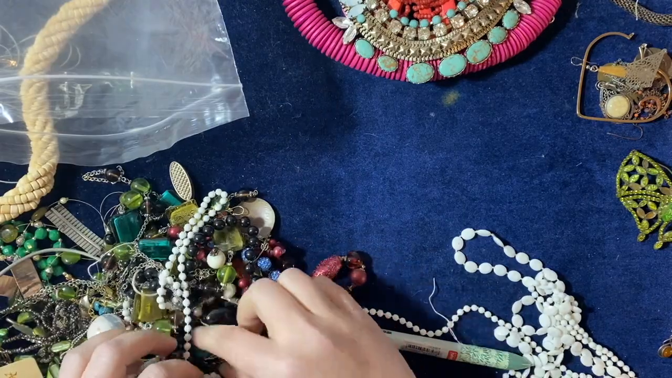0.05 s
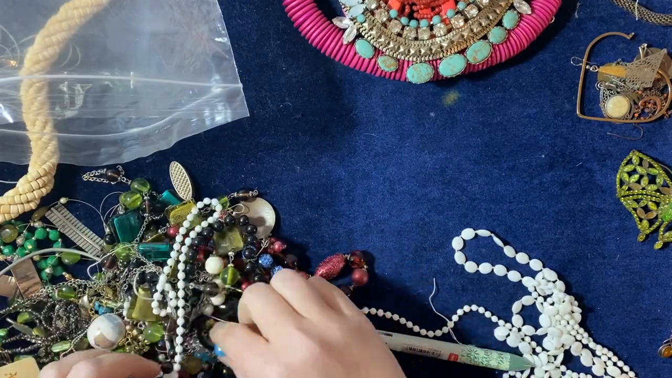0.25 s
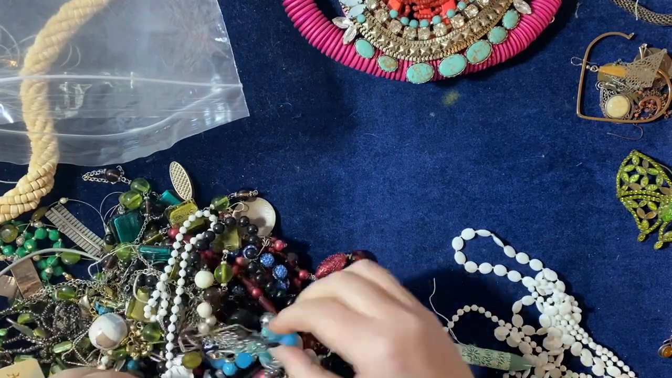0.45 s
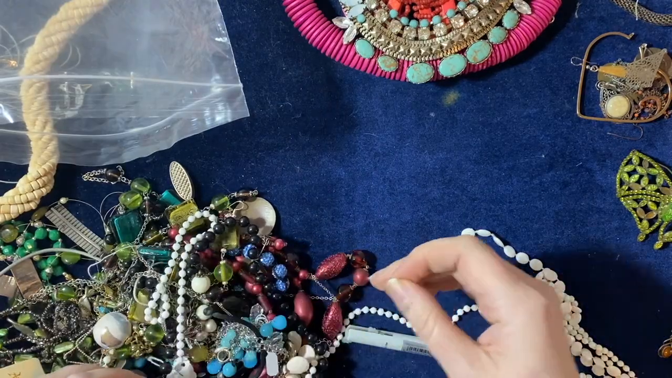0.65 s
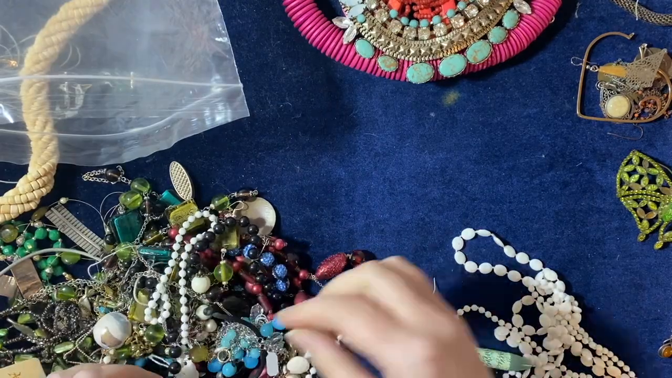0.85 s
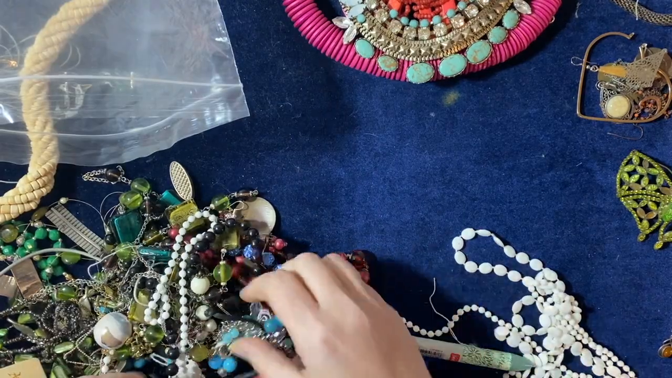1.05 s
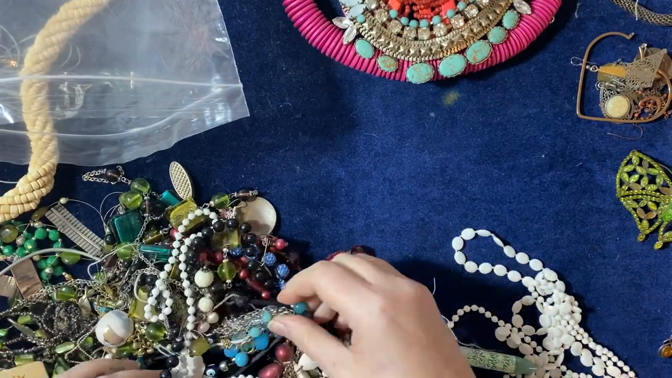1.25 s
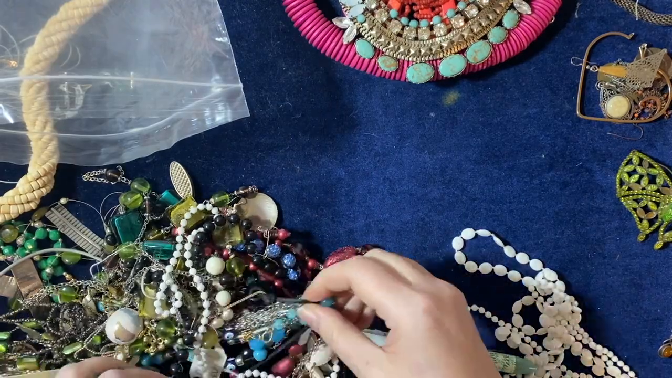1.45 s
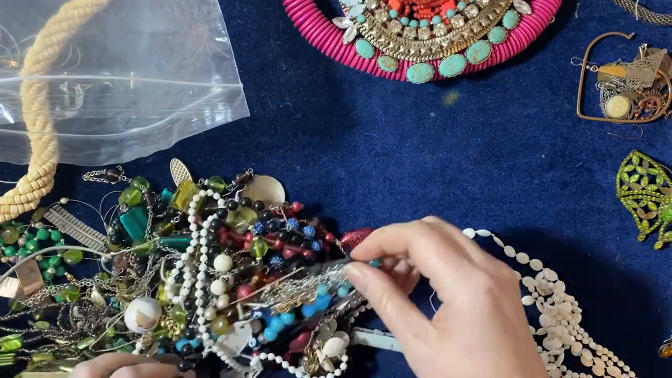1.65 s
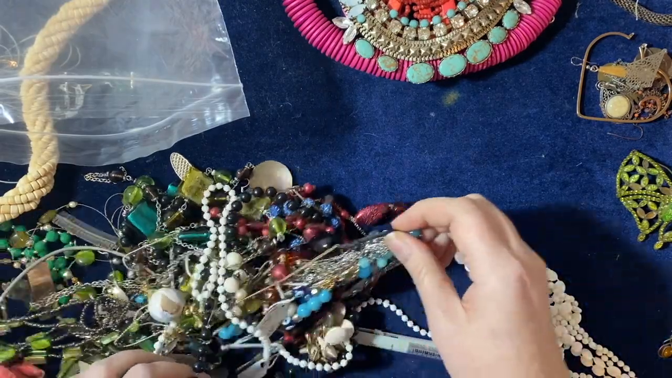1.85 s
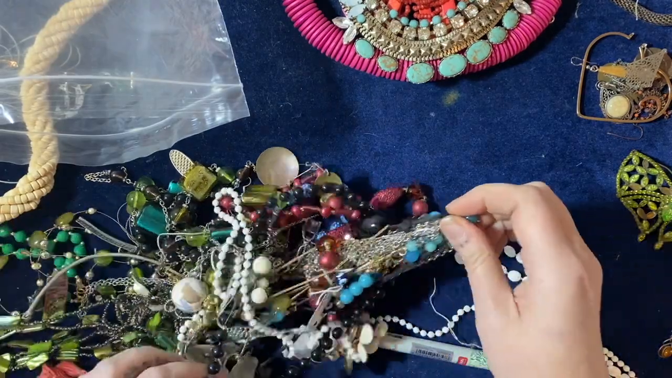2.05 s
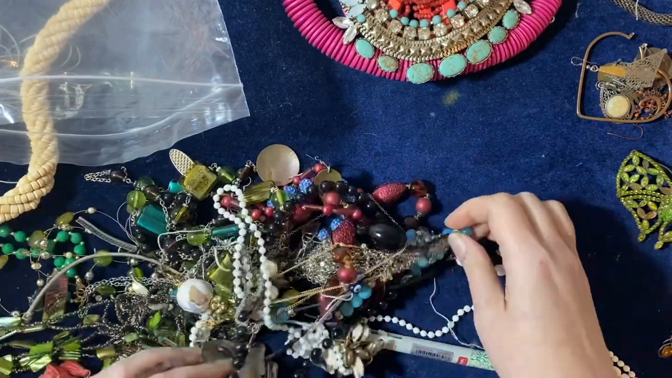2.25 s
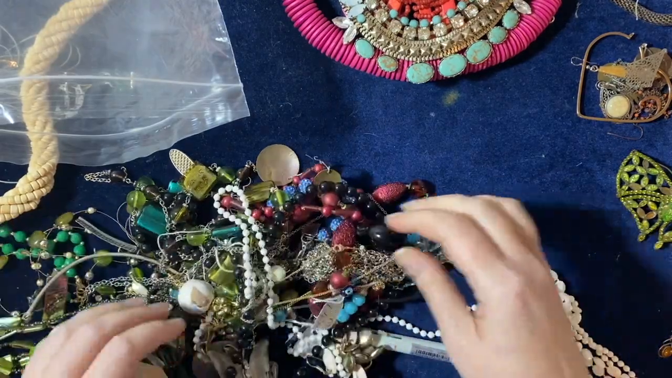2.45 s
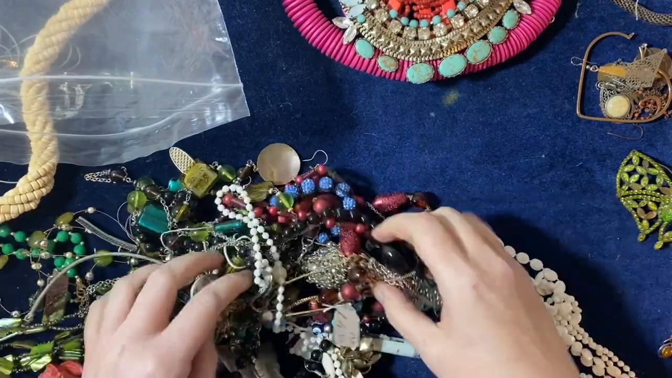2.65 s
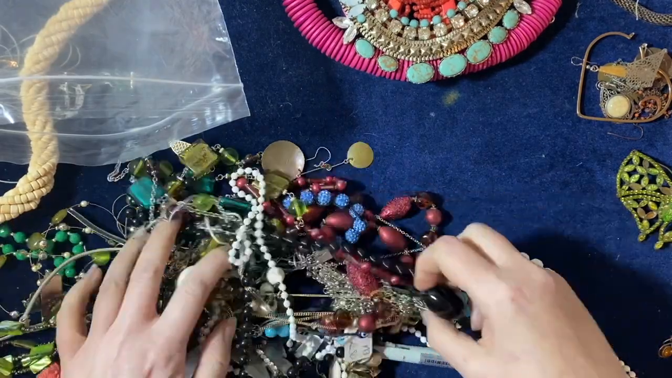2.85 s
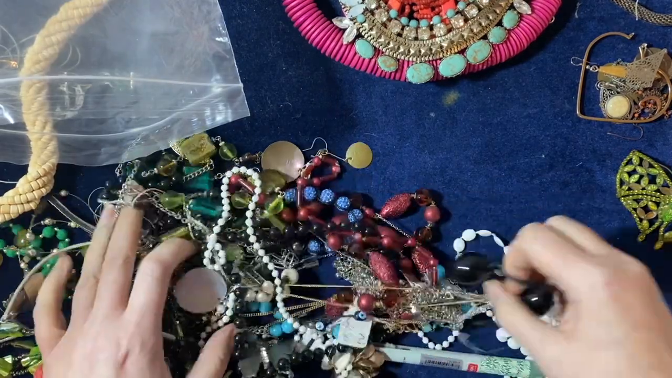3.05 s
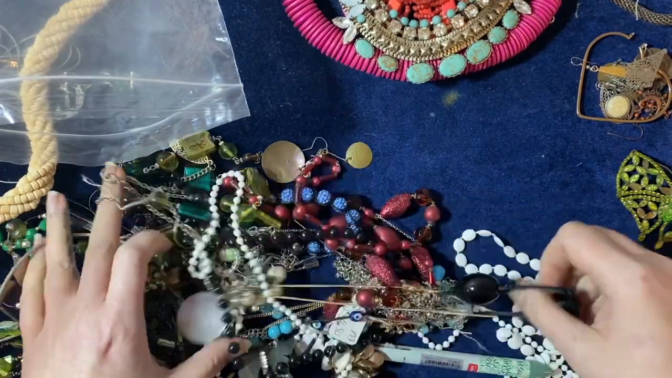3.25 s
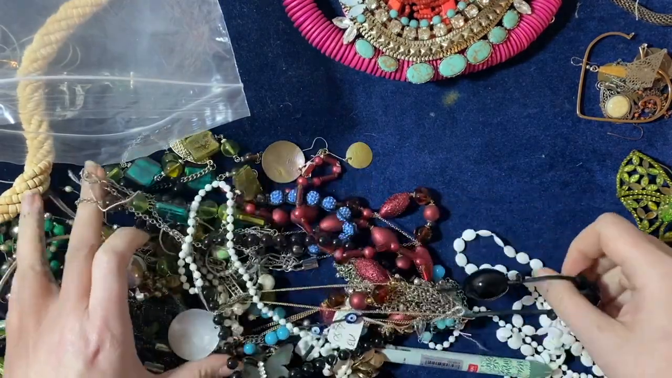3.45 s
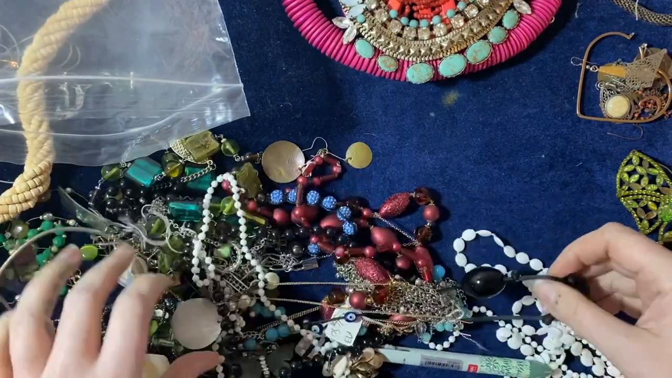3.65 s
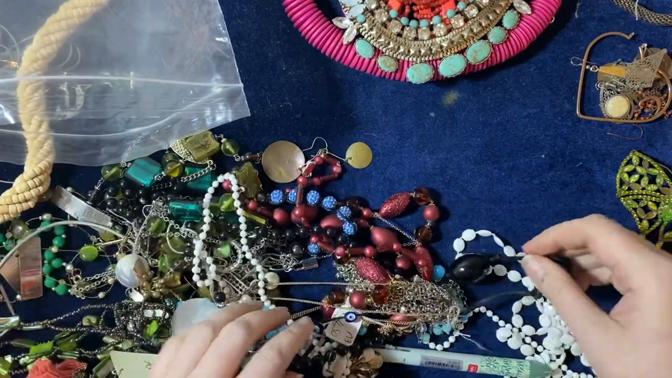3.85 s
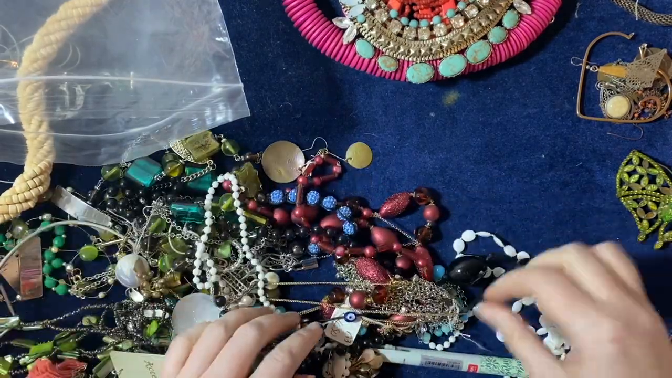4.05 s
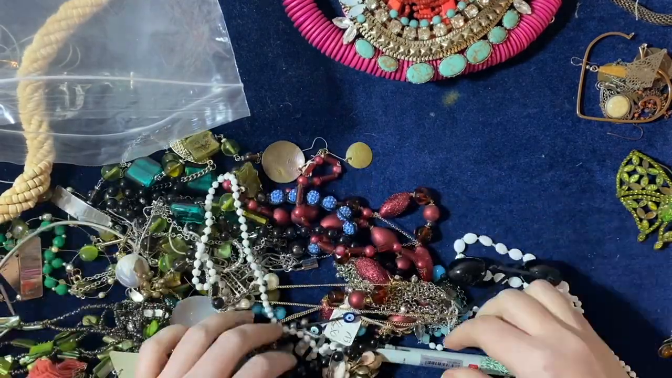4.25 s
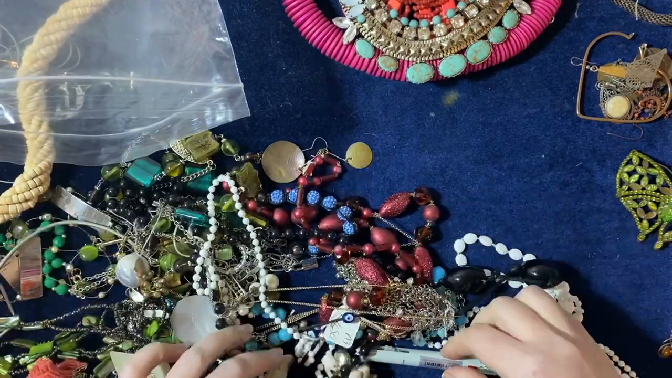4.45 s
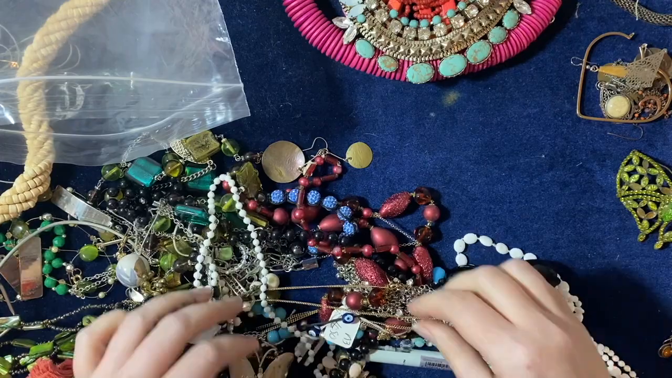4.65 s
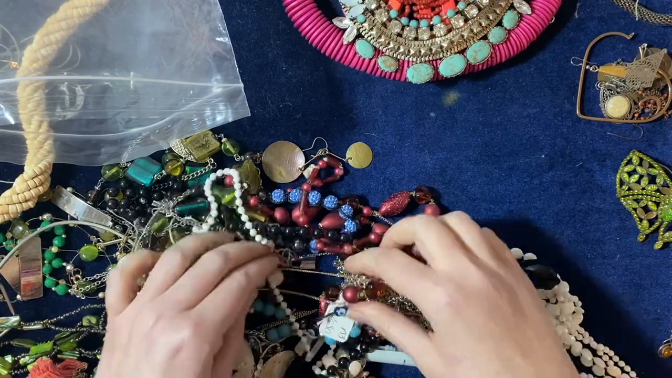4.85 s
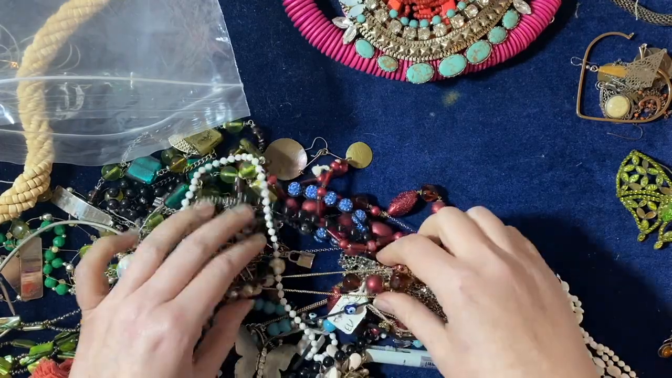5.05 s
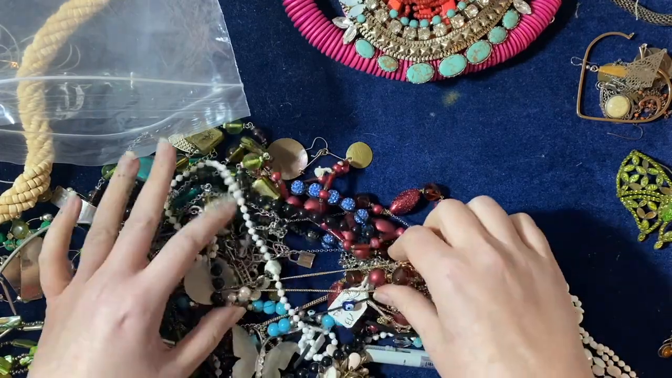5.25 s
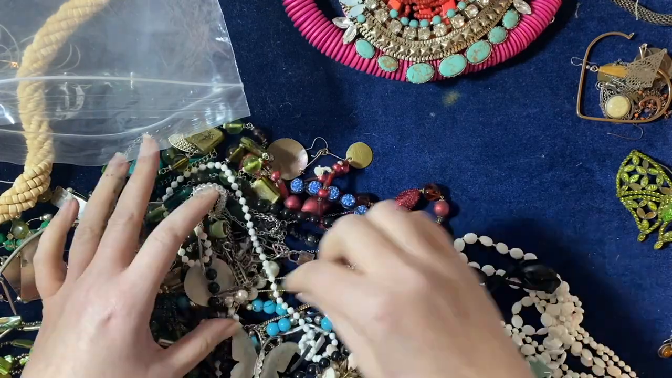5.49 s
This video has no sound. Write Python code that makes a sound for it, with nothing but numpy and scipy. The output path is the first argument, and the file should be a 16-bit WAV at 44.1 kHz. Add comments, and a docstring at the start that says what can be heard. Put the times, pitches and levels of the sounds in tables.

```python
"""Rummaging through bead strings and metal chains

Two hands stir a heap of jewellery on a cloth-covered table in a small room, close to a stereo microphone.
Sliding links sizzle and beads rattle: random contacts strike bands of noise, and loose pieces ring briefly.
Beads snap as paired noise bursts; pendants ring as close pairs of damped sines.
Heavy beads knock as modes within noise clusters; soft landings thud through the modes of the table.
A faint diffuse tail and quiet air noise lie around the heap."""
import sys
import numpy as np
from scipy import signal
from scipy.fft import rfft, irfft, next_fast_len
from scipy.io import wavfile
from scipy.ndimage import uniform_filter1d

SR = 44100
rng = np.random.default_rng(int(sys.argv[2]) if len(sys.argv) > 2 else 0)


def generate_wav(signal):
    """Clip the signal to [-1, 1] and save it as 16-bit WAV at the path in sys.argv[1]."""
    frames = np.transpose(np.atleast_2d(signal))
    scaled = np.clip(frames, -1, 1) * 32767
    pcm = np.round(scaled).astype(np.int16)
    wavfile.write(sys.argv[1], SR, pcm)


N = 243431  # length in samples

# background air, relative spectrum: f/Hz, level/dB
AIR_SPECTRUM = [(25, -6), (70, 20.5), (130, 7.5), (250, -16.5), (600, -5.5), (2000, -46.5), (7000, -46.5),
                (16000, -20)]
# hand strokes through the heap: start t/s, length t/s, chain links level/dB, small beads level/dB,
# swell over the stroke/dB, weight on the table/dB above the small beads
HAND_STROKES = [(0.007, 0.077, -51.5, -61.5, -2.5, 5), (0.108, 0.017, -44, -51.5, -8, 3),
                (0.192, 0.16, -49.5, -57, -16, -6), (0.38, 0.11, -42.5, -54, 7.5, -8),
                (0.561, 0.033, -40, -53, -8.5, 2), (0.663, 0.031, -58.5, -66, 3.5, -7),
                (0.869, 0.043, -74, -80.5, -3, 2), (0.974, 0.074, -65.5, -71, 0, -11.5),
                (1.05, 0.027, -47, -56.5, 2.5, 0.5), (1.118, 0.16, -54, -64.5, -5, -1.5),
                (1.285, 0.35, -51.5, -56.5, 8.5, -1), (1.682, 0.32, -45, -47.5, 2.5, -1),
                (1.997, 0.12, -45, -54, -4.5, 0), (2.16, 0.14, -43.5, -53.5, 3, 3.5),
                (2.389, 0.012, -65, -68.5, 4, 2.5), (2.547, 0.19, -40, -48, 4.5, 4.5),
                (2.758, 0.23, -38, -50, 2, 2.5), (3.022, 0.16, -43, -53.5, -4, 1),
                (3.231, 0.08, -43, -49.5, -5, 0.5), (3.36, 0.098, -53.5, -64.5, -5.5, 4.5),
                (3.528, 0.16, -45, -57, 9, 0.5), (3.861, 0.023, -72, -78, -4, 16.5),
                (3.959, 0.041, -72.5, -73, -1.5, 25), (4.14, 0.006, -56.5, -70, -6, 7.5),
                (4.265, 0.055, -57.5, -65, 6, 1.5), (4.372, 0.12, -53.5, -58, -18, -6.5),
                (4.533, 0.041, -53.5, -57.5, -0.5, -8.5), (4.8, 0.23, -45, -54.5, -0.5, 0.5),
                (5.049, 0.022, -46.5, -57.5, 14, -0.5), (5.117, 0.084, -45.5, -56.5, 0.5, 5.5),
                (5.273, 0.016, -44, -55.5, -0.5, -2), (5.332, 0.021, -59, -63, 4.5, 0),
                (5.503, 0.026, -66, -73, -7, -1)]
# relative spectra of the contacts, from the table to the finest chain: f/Hz, level/dB
RUMBLE_SPECTRUM = [(35, -16), (65, -8.5), (115, 1.5), (180, -4), (300, -11), (450, -11)]
HEAVY_SPECTRUM = [(350, 5), (500, -7), (700, 0), (1000, -2), (1300, -10.5), (1700, -5.5), (2100, -50.5)]
SMALL_SPECTRUM = [(1900, -3), (2800, -1.5), (4500, 4), (6700, -1)]
LINKS_SPECTRUM = [(6300, -4), (8000, -2.5), (10000, -10.2), (11500, 10.5), (13500, -8.2), (16000, 7)]
# beads and links snapping together: t/s, level/dB, f/Hz, hollow body level/dB relative to the snap's
# (both before the gains in clicks)
BEAD_CLICKS = [(0.0942, -19.5, 10400, -31), (0.4182, -17.5, 11700, -41.5), (0.3995, -27, 11700, -25.5),
               (0.478, -22, 11800, -34), (0.5326, -10.5, 15200, -28), (0.5405, -21, 7200, -28),
               (0.5814, -20, 10200, -42), (0.6824, -33, 11400, -41), (0.94, -23, 10400, -30.5),
               (1.063, -35, 7800, -36.5), (1.1867, -30, 6940, -39), (1.4122, -17.5, 15400, -32.5),
               (1.5961, -20.5, 12600, -41), (1.6866, -25.5, 15200, -15.5), (1.7493, -29, 4400, -13),
               (1.876, -28, 5300, -18), (1.936, -17.5, 11900, -24), (2.0773, -19.5, 12300, -34.5),
               (2.1553, -23, 9900, -37.5), (2.3043, -20.5, 8800, -30), (2.4088, -27.5, 13900, -28.5),
               (2.5075, -38, 10600, -19), (2.5402, -22, 8240, -23.5), (2.7616, -16, 15100, -27.5),
               (2.815, -17, 7060, -20), (2.826, -10, 10100, -41), (2.875, -18, 11300, -45),
               (2.9465, -12, 11700, -33), (2.9946, -14.5, 10300, -23), (3.056, -19.5, 12400, -35),
               (3.1976, -26, 10300, -43), (3.2276, -6.5, 15000, -53), (3.3167, -25, 10700, -36.5),
               (3.5475, -19, 11100, -56), (3.644, -15.5, 14800, -36), (3.873, -37.5, 11700, -38),
               (3.983, -49, 11800, -39), (4.106, -51, 11500, -41.5), (4.3378, -32, 11300, -34),
               (4.3585, -16, 14200, -29), (4.516, -25, 8040, -25), (4.6359, -42, 11400, -39),
               (4.787, -49, 3000, -22), (4.8237, -32.5, 2990, -10), (4.8778, -16.5, 11400, -40),
               (4.9728, -19.5, 9600, -31), (5.007, -21.5, 11100, -28), (5.1143, -10.5, 13400, -27),
               (5.2021, -20.5, 11300, -46), (5.2773, -21, 10850, -53), (5.3912, -27.5, 15000, -54.5)]
# soft landings of fingers and bundles on the padded table: t/s, level/dB before the gain in thuds
TABLE_THUDS = [(0.095, -46), (0.549, -51), (1.595, -54), (2.541, -30.5), (2.581, -28), (2.627, -28.5),
               (2.643, -39), (2.707, -26.5), (2.812, -24.5), (2.936, -30.5), (3.038, -38.5), (3.225, -42),
               (3.615, -25.5), (3.879, -30), (3.946, -29), (3.966, -32.5), (4.802, -39.5), (4.98, -36),
               (5.111, -34.5)]
# modes of the table top: f/Hz, relative level/dB, t60/s
TABLE_MODES = [(70, -14, 0.55), (113.8, -5, 0.25), (158.2, -1, 0.087), (230, 1.5, 0.085), (272, 3.5, 0.049),
               (337, -1, 0.058), (457, -5, 0.067), (566, -6, 0.034)]
# large beads knocking on the table: t/s, level/dB before the gains in knocks, f/Hz
BEAD_KNOCKS = [(0.096, -38.5, 825), (0.184, -40.5, 920), (0.553, -46.5, 840), (1.598, -43.5, 1020),
               (2.577, -25, 990), (2.625, -25.5, 975), (2.648, -27.5, 624), (2.698, -25, 1660),
               (2.715, -30, 624), (2.937, -31, 940), (2.994, -38.5, 890), (3.228, -30.5, 1020),
               (3.612, -30.5, 600), (3.650, -40.5, 1620), (3.881, -53, 800), (3.948, -34, 760),
               (3.95, -42.5, 1560), (4.519, -43.5, 1540), (4.824, -49.5, 1460), (5.116, -38.5, 740)]
# modes of one knock: ratio to its pitch, relative level/dB
MODES_OF_KNOCK = [(.47, -4), (1, -2), (1.679, -14)]
# partials of ringing pendants and rings: t/s, level/dB, f/Hz, t60/s
PENDANT_PARTIALS = [(0.186, -40.5, 3470, 0.015), (0.402, -40, 3680, 0.018), (0.696, -59, 3750, 0.09),
                    (0.938, -53, 2494, 0.14), (0.942, -45.5, 2900, 0.035), (0.942, -51, 4040, 0.044),
                    (0.940, -49, 4800, 0.039), (2.078, -50, 8000, 0.031), (4.557, -38, 4586, 0.044),
                    (4.556, -56, 4520, 0.33), (4.557, -35, 8180, 0.053), (4.557, -34, 10700, 0.027),
                    (4.637, -39, 11470, 0.023), (4.760, -52.5, 3620, 0.042), (4.785, -56, 2830, 0.043),
                    (4.801, -54, 2650, 0.061), (4.824, -29.5, 2920, 0.011), (4.822, -41, 3700, 0.012)]
# correlation of left and right: f/Hz, coefficient
STEREO_LIKENESS = [(100, .99), (300, .96), (600, .62), (2000, .56), (5200, .62), (7000, .87), (16000, .87)]
# microphone pair: f/Hz, phase by which left leads/rad, left over right level/dB
MICROPHONE_PORTS = [(0, 0, .3), (300, 0, .2), (700, -.4, 2.0), (1100, .9, 3.5), (1700, .6, 1.5),
                    (3000, .8, 4.0), (5000, 0, 2.5), (7200, 0, .4), (9100, -3.1, .2), (11200, -6.3, .2),
                    (13300, -9.4, .2), (15300, -12.4, 0), (17000, -12.9, 0)]

ATTACK_DB_PER_S, SETTLE_DB_PER_S = 551.5, 237  # a stroke starts quickly and settles more slowly
# the table is at TABLE_DB when the load on it is, and takes a share of the load's swing
TABLE_DB, TABLE_FOLLOWS = -53, .75
# heavy beads: dB relative to the small ones, and the share of a stroke's weight that they feel
HEAVY_DB, HEAVY_FEELS = -5.5, .6
# lesser clicks: number, level above the chains and its spread either way (dB)
TICK_COUNT, TICK_DB, TICK_SPREAD_DB = 110, 14.5, 3
# their hollow body (dB relative to the snap, as in BEAD_CLICKS), its spread either way (dB), pitch range
TICK_BODY_DB, TICK_BODY_SPREAD_DB, TICK_LOW_HZ, TICK_HIGH_HZ = -33.5, 9, 5900, 15000
ROOM_T60_S, ROOM_DB = 0.26, -16
CUTOFF_HZ = 15900


def from_db(db):
    """Logarithmic levels: decibels become an amplitude ratio."""
    return 10 ** (np.asarray(db) / 20)


def rms_one(x):
    """Normalisation: the mean power becomes 1."""
    return x / np.sqrt(np.mean(x ** 2) + 1e-20)


def at_hz(points, hz):
    """Interpolation on a logarithmic frequency axis."""
    f, value = np.transpose(points)
    return np.interp(np.log(hz), np.log(f), value)


def add(out, s, sound):
    """Superposition: a sound is summed in from time s."""
    start = int(np.clip(round(s * SR), 0, N - 1))
    out[..., start:start + sound.shape[-1]] += sound[..., :N - start]


def band(x, low, high, order=2):
    """Band limiting by a causal Butterworth filter."""
    sections = signal.butter(order, [low, min(high, .47 * SR)], "band", fs=SR, output="sos")
    return signal.sosfilt(sections, x + 1e-18)


def fading(t, t60):
    """Exponential decay: the level falls 60 dB in t60."""
    return np.exp(-np.log(1000) * t / t60)


def drift(rate):
    """Slow random fluctuation: straight lines join rate random values a second, at rms 1."""
    knots = rng.standard_normal(int(rate * N / SR) + 2)
    return rms_one(np.interp(np.arange(N) * rate / SR, np.arange(len(knots)), knots))


def pair(two, hz):
    """Partial correlation: the sum and difference of two unrelated draws form left and right."""
    alike = np.clip(at_hz(STEREO_LIKENESS, hz), 0, 1)
    shared = np.sqrt(1 + alike) * two[0]
    opposed = np.sqrt(1 - alike) * two[1] * np.array([[1], [-1]])
    return shared + opposed


def coloured(force, spectrum, count):
    """Forced resonance: random force drives count bands, neighbours from unrelated draws."""
    edges = np.geomspace(spectrum[0][0], spectrum[-1][0], count + 1)
    out = 0
    struck = force * rng.standard_normal((2, 2, N))
    for k, (low, high) in enumerate(zip(edges, edges[1:])):
        hz = np.sqrt(low * high)
        out = out + from_db(at_hz(spectrum, hz)) * band(pair(struck[k % 2], hz), low, high)
    return rms_one(out)


def air():
    """Stationary noise: the quiet air has a fixed spectrum and steady mean power."""
    return from_db(-66.0) * coloured(1, AIR_SPECTRUM, count=12)


def stirring():
    """Addition of powers: overlapping strokes sum to levels of chains, small beads and load, in dB."""
    t = np.arange(0, N, 44) / SR  # about 1 ms steps
    start, length, links_db, beads_db, swell_db, weight_db = np.transpose(HAND_STROKES)[:, :, None]
    age = t - start
    attack_db = ATTACK_DB_PER_S * np.minimum(age, 0)
    hold_db = swell_db * (np.clip(age / length, 0, 1) - .5)
    settle_db = SETTLE_DB_PER_S * np.maximum(age - length, 0)
    shape_db = attack_db + hold_db - settle_db

    def total(db):
        """Incoherent sources: their powers add."""
        power = np.sum(from_db(db + shape_db) ** 2, axis=0)
        return np.interp(np.arange(N) / SR, t, 10 * np.log10(power + 1e-20))

    return total(links_db), total(beads_db), total(beads_db + weight_db)


def rattle(level_db, spectrum, per_s, size_db, clump_db, settle_s, slide, count):
    """Clustered random impacts: harder stirring makes them denser, over a sliding hiss."""
    busy = from_db((level_db - level_db.max()) / 2)
    born = rng.random(N) < per_s * busy * from_db(clump_db * drift(45)) / SR
    energy = born * from_db(size_db * np.minimum(rng.exponential(1, N), 3.5)) ** 2
    # each contact jostles its neighbours: its energy decays with time constant settle_s
    energy = signal.lfilter([1], [1, -np.exp(-1 / (settle_s * SR))], energy + 1e-18)
    # the hand sets the overall effort, the contacts only share it out (over about 50 ms)
    energy = energy / (uniform_filter1d(energy, size=2200) + 0.011 * energy.mean())
    return from_db(level_db) * coloured(np.sqrt(energy + slide ** 2), spectrum, count=count)


def beads(level_db, low_hz, high_hz, per_s, size_db, cycles, gain_db, count):
    """Damped free vibration: loose pieces tapped at random lose 60 dB in the given number of cycles."""
    out, t = np.zeros((2, N)), np.arange(SR // 30) / SR
    pitches, ports = np.geomspace(low_hz, high_hz, count), np.array([[1], [-1]])
    for when, which, size, side, apart, chance in rng.random((2000, 6)):
        if chance < per_s * N / SR / 2000:  # keep per_s taps a second on average
            hz = pitches[int(which * count)]
            tap_db = size_db * min(-np.log(1 - size), 3)
            strength = from_db(level_db[int(when * N)] + gain_db + tap_db)
            # each tap has a phase and level difference between the ports
            tone = np.sin(2 * np.pi * hz * t + ports * (apart - .5)) * from_db(ports * 0.5 * side)
            add(out, when * N / SR, strength * tone * fading(t, cycles / hz))
    return out


def heap(links_db, small_db, load_db):
    """Contact noise in four size classes, from table to finest chain, with loose clacks, taps and tinkles."""
    rumble_db = TABLE_DB + TABLE_FOLLOWS * (load_db - TABLE_DB)
    heavy_db = small_db + HEAVY_DB + HEAVY_FEELS * (load_db - small_db)
    rumble = rattle(rumble_db, RUMBLE_SPECTRUM, per_s=130, size_db=2.5, clump_db=1.0,
                    settle_s=0.011, slide=0.57, count=7)
    heavy = from_db(-1) * rattle(heavy_db, HEAVY_SPECTRUM, per_s=300, size_db=-2.5, clump_db=4.5,
                                 settle_s=0.007, slide=0.64, count=11)
    small = from_db(-1.2) * rattle(small_db, SMALL_SPECTRUM, per_s=600, size_db=4, clump_db=4.5,
                                   settle_s=.0017, slide=.45, count=6)
    links = from_db(-2.45) * rattle(links_db, LINKS_SPECTRUM, per_s=990, size_db=4.5, clump_db=6.0,
                                    settle_s=0.0012, slide=0.3, count=6)
    clacks = beads(heavy_db, low_hz=400, high_hz=1800, per_s=70, size_db=2.5,
                   cycles=24, gain_db=2.5, count=18)
    taps = beads(small_db, low_hz=2200, high_hz=6500, per_s=170, size_db=2.7,
                 cycles=32, gain_db=2, count=40)
    tinkle = beads(links_db, low_hz=7090, high_hz=14400, per_s=110, size_db=4,
                   cycles=300, gain_db=-7, count=24)
    return rumble + heavy + small + links + clacks + taps + tinkle


def ticks(links_db):
    """Random point events: rows of lesser clicks, evenly likely in time, as strong as the chains move."""
    when, pitch, size, hollow = rng.random((TICK_COUNT, 4)).T
    db = links_db[(when * N).astype(int)] + TICK_DB + TICK_SPREAD_DB * (2 * size - 1)
    hz = TICK_LOW_HZ * (TICK_HIGH_HZ / TICK_LOW_HZ) ** pitch
    hollow_db = TICK_BODY_DB + TICK_BODY_SPREAD_DB * (2 * hollow - 1)
    return np.transpose([when * N / SR, db, hz, hollow_db])


def over_1_ms(x):
    """Energy normalisation: a burst gets the energy of rms 1 lasting 1 ms."""
    return x / np.sqrt(np.sum(x ** 2) / 2 / (SR / 1000))


def contact(t, rise_s=.0004, snap_t60=.0042, jostle_t60=0.072, jostle_db=-26):
    """Two-stage decay: a snap dies quickly and leaves the weaker jostling of the string."""
    decay = fading(t, snap_t60) + from_db(jostle_db) * fading(t, jostle_t60)
    return (1 - np.exp(-t / rise_s)) * decay


def clicks(rows, bounce_db=-14, snap_db=-6.5, body_db=8, width=1.467, body_low_hz=600, body_high_hz=6500):
    """Impact and rebound: a snap around the bead's pitch repeats weakly after 2.4-2.7 ms, with a duller body."""
    out, t = np.zeros((2, N)), np.arange(1800) / SR
    rebounds = rng.uniform(0.0024, 0.0027, len(rows))
    noises = rng.standard_normal((len(rows), 2, 2, len(t)))
    for (s, db, hz, hollow_db), rebound, noise in zip(rows, rebounds, noises):
        shape = contact(t) + from_db(bounce_db) * contact(np.maximum(t - rebound, 0))
        snap = over_1_ms(band(pair(noise[0], hz) * shape, hz / width, hz * width))
        body = over_1_ms(band(pair(noise[1], 2500) * shape, body_low_hz, body_high_hz))
        add(out, s, from_db(db) * (from_db(snap_db) * snap + from_db(hollow_db + body_db) * body))
    return out


def thuds(gain_db=-5, spread_db=2.5, contact_s=0.0023, travel_s=0.0019):
    """Modal excitation: a soft landing drives each table mode with a strength that depends on the spot."""
    out, t = np.zeros(N), np.arange(SR // 3) / SR
    hz, mode_db, t60 = np.transpose(TABLE_MODES)[:, :, None]
    t = np.maximum(t - travel_s * np.sqrt(hz[0] / hz), 0)  # low bending waves travel more slowly
    modes = np.sin(2 * np.pi * hz * t) * fading(t, t60) * (1 - np.exp(-t / contact_s))
    for (s, db), spot in zip(TABLE_THUDS, rng.standard_normal((len(TABLE_THUDS), len(TABLE_MODES), 1))):
        add(out, s, np.sum(from_db(db + gain_db + mode_db + spread_db * spot) * modes, axis=0))
    return band(out, 75, 1100)  # the thuds keep above 75 Hz, and the cloth mutes the top


def knocks(t60=0.023, width=1.144, gain_db=-7, tone_db=-10, tone_t60=0.025):
    """Modal clusters: each clear mode of a large bead's hollow clack sits inside rougher neighbours."""
    out, t = np.zeros((2, N)), np.arange(SR // 16) / SR
    noises = rng.standard_normal((len(BEAD_KNOCKS), len(MODES_OF_KNOCK), 2, len(t)))
    for (s, db, pitch), draws in zip(BEAD_KNOCKS, noises):
        for (ratio, mode_db), noise in zip(MODES_OF_KNOCK, draws):
            hz = pitch * ratio
            cluster = band(pair(noise, hz) * fading(t, t60), hz / width, hz * width)
            rough = from_db(gain_db) * rms_one(cluster) / 4
            tone = np.sin(2 * np.pi * hz * t) * (fading(t, tone_t60) - fading(t, tone_t60 / 10))
            add(out, s, from_db(db + mode_db) * (rough + from_db(tone_db) * tone))
    return out


def chimes(split=0.014, partner_db=-5, buzz=0.48, buzz_hz=350):
    """Mode splitting: metal and glass ring in close pairs, buzzing on neighbours until the heap damps them."""
    out, t = np.zeros(N), np.arange(SR // 3) / SR
    noises = rng.standard_normal((len(PENDANT_PARTIALS), len(t)))
    for (s, db, hz, t60), noise in zip(PENDANT_PARTIALS, noises):
        main = np.sin(2 * np.pi * hz * t)
        # the shared decay below shortens the partner's own
        partner = from_db(partner_db) * np.sin(2 * np.pi * hz * (1 + split) * t) * fading(t, 2 * t60)
        touch = 1 + buzz * rms_one(band(noise, 16, buzz_hz, order=1))
        add(out, s, from_db(db) * (main + partner) * touch * fading(t, t60))
    return out


def room(x, wall_hz=5500, rise_s=0.0012):
    """Diffuse reverberation: a faint decaying noise tail, band-limited and unlike at the two sides."""
    t = np.arange(SR // 2) / SR
    tail = band(rng.standard_normal((2, len(t))), 160, wall_hz)
    tail = tail * fading(t, ROOM_T60_S) * (1 - np.exp(-t / rise_s))
    response = rms_one(tail) / np.sqrt(len(t))  # unit energy
    return from_db(ROOM_DB) * signal.fftconvolve(x, response, axes=1)[:, :N]


def scene():
    """Superposition of the jewellery, its room and the quiet air."""
    links_db, small_db, load_db = stirring()
    moving = heap(links_db, small_db, load_db)
    snaps = clicks(BEAD_CLICKS) + clicks(ticks(links_db))
    near = moving + snaps + thuds() + knocks() + chimes()
    return near + room(near) + air()


def record(dry):
    """Port differences in phase and level: left is louder in mid-range and lags in treble; the top is cut."""
    size = next_fast_len(N + SR // 10)
    hz, lead, left_db = np.transpose(MICROPHONE_PORTS)
    f = np.arange(size // 2 + 1) * SR / size
    # half of each difference goes to the left, its inverse to the right
    half = np.exp(.5j * np.interp(f, hz, lead)) * from_db(np.interp(f, hz, left_db) / 2)
    heard = irfft(rfft(dry, size) * np.array([half, 1 / half]), size)[:, :N]
    return signal.sosfilt(signal.ellip(10, .3, 70, CUTOFF_HZ, fs=SR, output="sos"), heard)


dry = scene()
out = record(dry)
generate_wav(out)
```